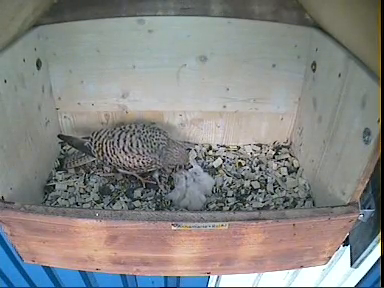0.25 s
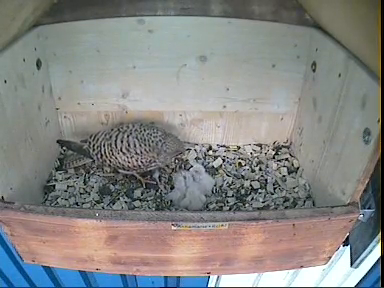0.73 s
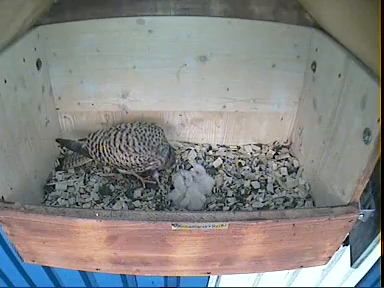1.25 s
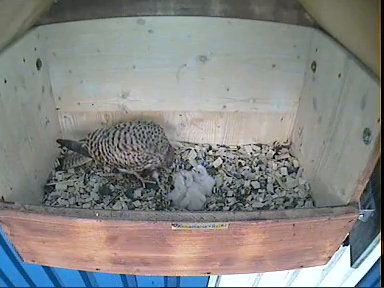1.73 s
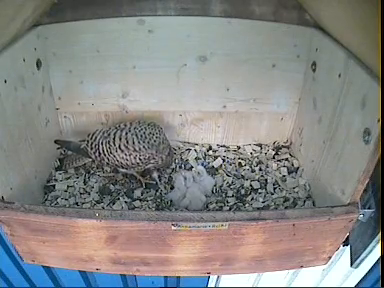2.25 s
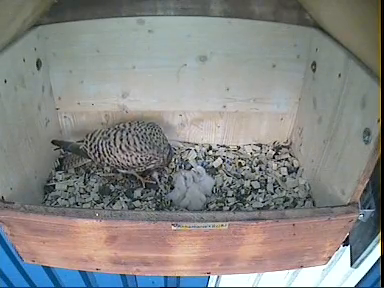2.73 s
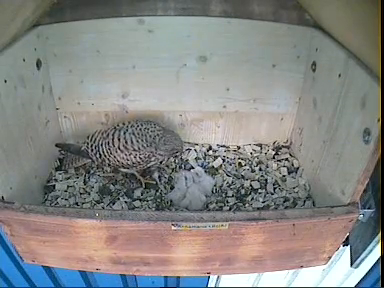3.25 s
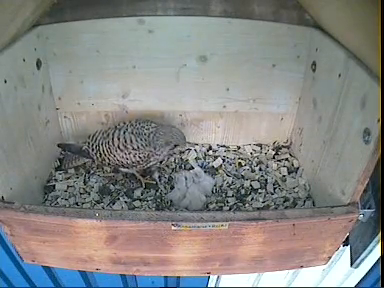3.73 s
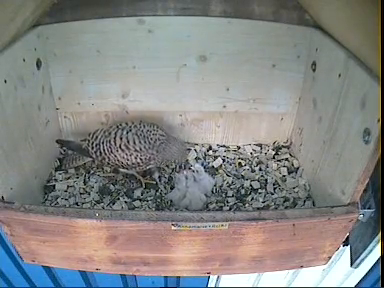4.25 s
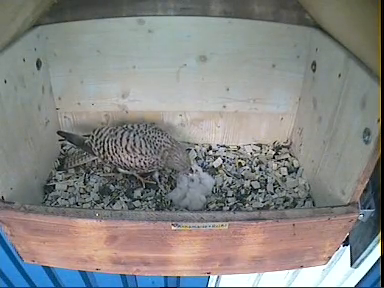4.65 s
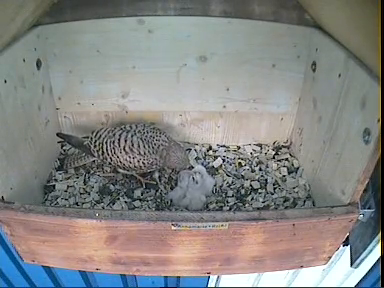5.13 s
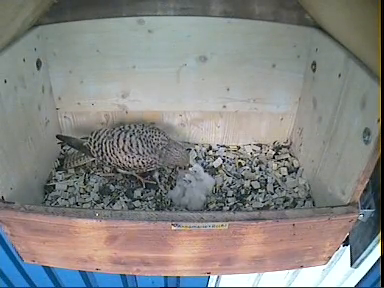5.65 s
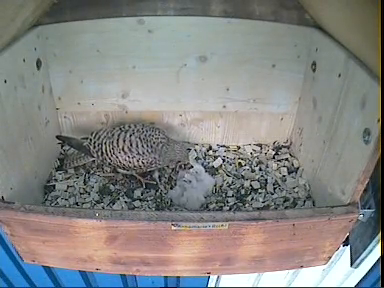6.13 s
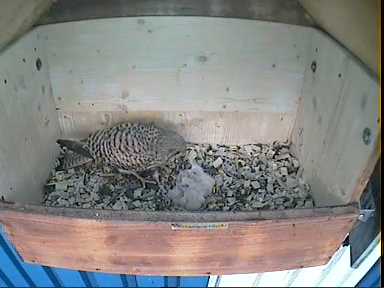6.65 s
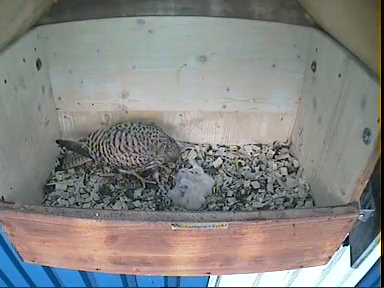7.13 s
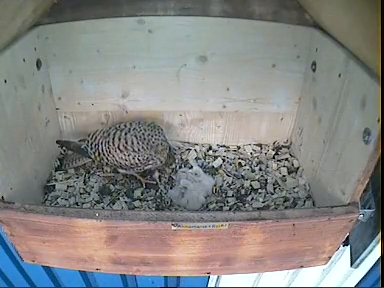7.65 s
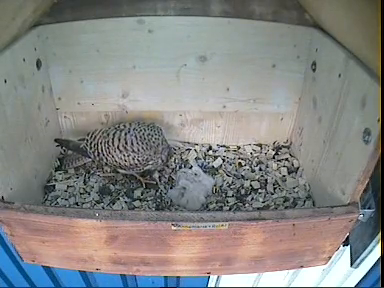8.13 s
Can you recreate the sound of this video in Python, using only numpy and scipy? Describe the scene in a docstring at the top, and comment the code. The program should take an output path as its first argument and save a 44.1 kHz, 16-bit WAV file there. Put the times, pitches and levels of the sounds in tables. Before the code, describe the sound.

Soft, evenly spaced chick peeps and three short, raspy squeaks from an adult falcon sound over a steady low rumble and hum.

```python
"""Inside a wooden nest box, a falcon chick peeps while the adult beside it gives three rough squeaks.
Each peep is a whistle that rises and falls, sometimes broken by a second, higher voice. Each squeak
follows a smack of the beak and is rough because two voices beat together while air rasps through.
Feathers and litter rustle, and the walls echo. Distant outdoor noise rings in the air of the box over
a low rumble, a hum, a thin whine and the faint buzz of the small camera whose microphone listens."""
import sys
import numpy as np
from scipy import signal
from scipy.fft import rfft, irfft
from scipy.io import wavfile
from scipy.ndimage import uniform_filter1d

SR = 44100
rng = np.random.default_rng(int(sys.argv[2]) if len(sys.argv) > 2 else 0)


def digitize_waveform(pressure):
    """Quantize a signal to 16-bit integers and store it at the path in sys.argv[1].

    Rows of a 2-D input are taken as channels; values are limited to [-1, 1].
    """
    field = np.atleast_2d(pressure).T
    bounded = np.clip(field, -1, 1)
    quanta = np.round(bounded * 32767).astype(np.int16)
    wavfile.write(sys.argv[1], SR, quanta)


N = 369558

# how well the box and microphone pass each pitch: pitch_hz, gain_db
PATH_TO_MIC = [(1900, -6), (2150, 1), (2350, 0), (2550, -6), (2850, -13), (3200, -12), (4000, -17),
               (4350, -9), (4700, -1), (5000, -5), (5300, -21), (5750, -20), (6300, -9), (7000, -18),
               (7700, -5), (8300, -20), (9000, -40)]


def chick():
    """The chick's peeps arch up and down in pitch; the low voice gives way when a high one breaks in."""
    # low voice: start_s, rise_s, fall_s, top_hz, level_db (before the path to the microphone)
    peeps = [(.629, 0.0427, 0.065, 2750, -44.5), (1.377, 0.0432, 0.044, 2780, -45),
             (2.152, 0.044, 0.044, 2807, -44), (2.837, 0.046, 0.043, 2870, -44.5),
             (3.518, 0.036, 0.054, 2894, -42.5), (4.289, 0.037, 0.0522, 2886, -43.5),
             (5.114, .042, .045, 2876, -45), (5.888, .037, .048, 2880, -42.5),
             (6.644, .064, 0.065, 3250, -56), (7.493, 0.037, .051, 2880, -43.5)]
    # high voice: start_s, length_s, pitch_hz, level_db, share_taken (from the low voice, 0 to 1)
    voice_breaks = [(3.551, 0.016, 3700, -61, 0.6), (4.322, 0.031, 3800, -57.5, 0.6),
                    (5.155, 0.025, 3670, -62, 0.4), (5.916, 0.035, 3750, -57.5, .85),
                    (6.71, 0.034, 4550, -68, 0.5), (7.528, 0.023, 3765, -57.5, 0.7)]
    # shape of the arch: top_hz, exponent (larger is flatter on top)
    flatness = [(2800, 1.45), (2890, 2.45), (3250, 2.1)]
    climb_hz_per_s, fall_hz = 15000, 905
    low, high, taken = np.zeros((3, N))
    for start, rise, fall, top_hz, db in peeps:
        flat = value_at(flatness, top_hz)
        t = np.arange(-rise, fall, 1 / SR)
        rising = climb_hz_per_s * rise * abs(t / rise) ** flat
        falling = fall_hz * abs(np.sin(np.pi / 2 * t / fall)) ** (1.8 * flat)
        hz = top_hz - np.where(t < 0, rising, falling) + 15 * wobble(len(t), 100)
        fade = np.clip(np.minimum((t + rise) / 0.0013, (fall - t) / 0.0053), 0, 1)
        level = gain_of(db + 1.2 * wobble(len(t), 70))
        add(low, start, level * fade * whistle(hz, overtone_db=-14))
    for start, length, hz, db, share in voice_breaks:
        position = np.linspace(-1, 1, round(length * SR))
        fade = signal.windows.tukey(len(position), .45)
        arch_hz = hz * (1 - 0.053 * position ** 2) + 30 * wobble(len(position), 60)
        level = gain_of(db - value_at(PATH_TO_MIC, hz))
        add(high, start, level * fade * whistle(arch_hz, overtone_db=-32))
        add(taken, start, share * fade)
    return low * (1 - taken) + high


def whistle(hz, overtone_db):
    """A tone with two flickering overtones, each shaped by the path to the microphone."""
    phase = phase_of(hz)
    strain_db = 0.044 * np.clip(hz - 2850, 0, 300)  # the voice strains at high pitch
    flicker_db = 3.6 * wobble(len(hz), 100) + strain_db
    levels_db = [0, overtone_db + flicker_db, overtone_db - 11 - flicker_db]
    return np.sqrt(2) * sum(gain_of(db + value_at(PATH_TO_MIC, k * hz)) * np.sin(k * phase)
                            for k, db in enumerate(levels_db, 1))


def adult(mix):
    """Each squeak starts thin and high, snaps down into two beating voices and leaves a rasp of air."""
    # start_s (of the full voice), hold_s, pitch_hz, level_db, mid_change_db, overtone_db, after_db,
    # air_db, tail_s, beat_hz (how far below the second voice is), second_db, half_pitch_db, thump_db
    squeaks = [(0.679, 0.015, 1926, -17.5, -8.5, -20.5, -35.5, -39.5, 0.019, 150, -8.5, -26.5, -19.5),
               (5.204, 0.016, 2325, -27, -2, 3.5, -52, -30.5, 0.051, 366.4, -1, -7.5, -11.5),
               (5.822, 0.014, 2260, -20.5, 1.5, -5.5, -53, -33.5, 0.054, 328, -18, -16, -28)]
    # tone colour of the rasping air: pitch_hz, gain_db
    rasp_colour = [(600, -13), (1500, -1), (2500, 0), (3150, -21.5), (3700, -4.5), (4200, -14),
                   (5200, -0.5), (6200, -24.5), (7500, -8.5), (9200, -15.5), (9700, -29)]
    lead_s, attack_s, release_s, fade_s = .021, 0.00483, .007, 0.013
    tail_db_per_s, thump_hz = -450, 382.7
    for (start, hold, held_hz, held_db, mid_db, top_db, after_db, air_db, tail,
         beat_hz, second_db, half_db, thump_db) in squeaks:
        t = np.arange(start - lead_s, start + hold + tail + fade_s, 1 / SR)
        # pitch and levels slide from one of these moments to the next
        moments = start + np.array([-lead_s, -attack_s, 0, hold / 2, hold,
                                    hold + release_s, hold + tail, hold + tail + fade_s])
        hz = np.interp(t, moments[:6], [2801, 2655, held_hz, held_hz, held_hz - 20, 2310])
        voice_db = np.interp(t, moments, [-64, -44.5, held_db, held_db + mid_db, held_db,
                                          after_db, after_db + tail_db_per_s * tail, -86.5])
        overtone_db = np.interp(t, moments[1:6], [0.5, top_db - 5, top_db, top_db - 7, -16])
        rasp_db = np.interp(t, np.delete(moments, 3), [-46, -39.5, air_db, air_db - 3.5, -40, -56, -86.5])
        phase = phase_of(hz + 25 * wobble(len(t), 40))
        beat = 2 * np.pi * beat_hz * (t - start - .0025)
        voice = np.sin(phase) + gain_of(second_db) * np.sin(phase - beat)
        octave = np.cos(2 * phase) * (1 + 0.21 * np.cos(beat))  # cosine makes downward swings larger
        upper = gain_of(-22) * (np.sin(3 * phase) + 0.32 * np.sin(4 * phase))
        voice += gain_of(overtone_db) * (octave + upper)
        # every other cycle differs, which adds a tone at half the pitch
        voice += gain_of(half_db) * (np.sin(phase / 2) + 0.23 * np.sin(3 * phase / 2))
        voice += gain_of(thump_db) * np.sin(2 * np.pi * thump_hz * t)  # the air in the box thumps
        rasp = gain_of(rasp_db) * shaped_noise(value_at(rasp_colour, np.fft.rfftfreq(8192, 1 / SR)), len(t))
        voice *= np.sqrt(2) * gain_of(voice_db + 1.05 * wobble(len(t), 40))
        add(mix, t[0], (voice + rasp) * signal.windows.tukey(len(t), .08))


def beak_smacks(mix):
    """The beak opens with a smack before each squeak."""
    # start_s, peak_db, pitch_hz, rise_s, ring_s
    smacks = [(0.6598, -27.5, 2060, 0.0044, 0.015), (5.1821, -25, 1970, 0.00176, 0.026),
              (5.8, -25.5, 1860, 0.0015, 0.025)]
    for start, *shape in smacks:
        add(mix, start, click(*shape, grit=0.52, grain_samples=20))


def litter_ticks(mix):
    """Faint dry ticks in the litter on the floor."""
    # start_s, peak_db
    ticks = [(2.281, -62), (7.878, -54)]
    for start, db in ticks:
        add(mix, start, click(db, hz=7700, rise_s=.001, ring_s=.02, grit=0.45, grain_samples=6))


def rustles(mix):
    """Feathers and litter rustle and wheeze: grainy puffs of noise, each around one pitch."""
    # start_s, length_s, pitch_hz, width_hz, level_db
    puffs = [(.97, 0.078, 4700, 1210, -68), (1.032, .08, 4120, 900, -68), (4.417, 0.12, 4630, 900, -70.5),
             (6.066, 0.098, 7500, 3010, -76.5), (7.23, .05, 4600, 150, -71),
             (7.682, 0.15, 4570, 150, -71.5), (7.89, 0.035, 4460, 150, -69), (7.963, 0.11, 3600, 120, -75)]
    hz = np.fft.rfftfreq(8192, 1 / SR)
    for start, length, pitch, width, db in puffs:
        count = round(length * SR)
        puff = shaped_noise(-12 * np.log10(1 + (2 * (hz - pitch) / width) ** 4), count)
        level = gain_of(db + 2.3 * wobble(count, 150))
        add(mix, start, level * np.hanning(count) * puff)


def wall_echoes(sound, ring_s=0.098):
    """The wooden walls throw back many quick echoes."""
    t = np.arange(8000) / SR
    echoes = rng.standard_normal(len(t)) * gain_of(-60 * t / ring_s) * (t > .0015)
    return signal.oaconvolve(sound, echoes / np.linalg.norm(echoes))[:N]


def outdoor_wash(level_db=-42.5):
    """Outdoor noise and rumble swell gently, and the air in the box rings at its own pitches."""
    # tone colour of the noise: pitch_hz, gain_db
    colour = [(12, -32.5), (20, -8.5), (36, -13.5), (48, 0), (64, 0), (85, -10), (130, -7.5), (165, -19),
              (215, -37.5), (300, -21), (770, -22.5), (1000, -23), (2000, -26), (2450, -40), (3300, -47),
              (5000, -55), (6200, -59.5), (7600, -65.5), (8200, -72), (8700, -87)]
    # where the air in the box rings: pitch_hz, width_hz, boost_db
    box_rings = [(359.8, 17, 7), (838, 21, 10), (936, 76, 10.5), (1076.3, 120, 6.5), (1317.9, 74, 7),
                 (1585, 70, 7.5), (1806.2, 145, 10), (4360, 547, 12)]
    # swell near 900 Hz: time_s, gain_db
    middle_swell = [(0, -0.5), (2.4, -1.8), (5.5, 0.5), (6.3, 1.5), (7.35, 3.5), (8.38, -0.5)]
    # swell of the rumble: time_s, gain_db
    rumble_swell = [(0, -1), (1.3, -1.5), (3.5, 2.55), (4.2, -0.5), (6.0, -1.66), (8.38, -0.5)]
    frames, hz = N // 512 + 4, np.fft.rfftfreq(2048, 1 / SR)
    real, imaginary, patches = rng.standard_normal((frames, 1025, 3)).T
    # audio compression makes the faint high hiss flicker in patches
    patches = unit_level(uniform_filter1d(uniform_filter1d(patches, 14, axis=0), 8, axis=1))
    compression_db = value_at([(3000, 0.69), (5000, 1.3), (7000, 7.91)], hz)[:, None] * patches
    swell_db = np.outer(np.exp(-np.log((hz + 1) / 900) ** 2 / 0.65), over_time(middle_swell, frames))
    swell_db += np.outer(np.exp(-(hz / 110) ** 4), over_time(rumble_swell, frames))
    ring_db = sum(db / (1 + (2 * (hz - pitch) / width) ** 2) for pitch, width, db in box_rings)
    steady_db = (value_at(colour, hz) + ring_db)[:, None]
    spectrum = (real + 1j * imaginary) * gain_of(steady_db + swell_db + compression_db)
    noise = signal.istft(spectrum, nperseg=2048, noverlap=1536)[1][:N]
    return gain_of(level_db) * unit_level(noise)


def whine():
    """A thin tone that wanders in pitch as it comes and goes."""
    # time_s, pitch_hz, level_db
    course = [(0, 814, -51.5), (.42, 805, -63.5), (.6, 820, -54.5), (1.0, 814, -62), (2.4, 814.9, -59.5),
              (3.08, 816, -52.5), (3.4, 802, -58.5), (4.04, 810, -56), (4.62, 807, -73), (4.95, 803, -54.5),
              (5.5, 810, -65), (5.95, 811, -49.5), (6.3, 803, -66), (8.38, 814, -59)]
    times, pitches, _ = np.transpose(course)
    hz = np.interp(np.arange(N) / SR, times, pitches)
    return wavering_tone(hz, over_time(course, N), waver_hz=4.81, smooth_samples=1500)


def hum(hz=118.77):
    """A low hum that comes and goes."""
    # time_s, level_db
    levels = [(0, -48), (.25, -44.5), (.58, -71), (1.45, -66), (1.75, -49), (2.4, -47.5), (3.4, -50.5),
              (3.7, -53.5), (4.6, -55), (5.0, -56), (5.95, -52.5), (6.3, -62), (7.35, -52.5), (8.38, -54.5)]
    return wavering_tone(hz, over_time(levels, N), waver_hz=1.5, smooth_samples=4000)


def camera_buzz(centre_hz=8000, step_hz=100 / 3, each_db=-88.5):
    """The electronics buzz: six close tones add up to one tone swept again and again."""
    t = np.arange(N) / SR
    tones = sum(np.sin(2 * np.pi * ((centre_hz + (k - 2.5) * step_hz) * t + k * k / 12))
                for k in range(6))
    return gain_of(each_db) * np.sqrt(2) * tones


def click(db, hz, rise_s, ring_s, grit, grain_samples):
    """An unsteady ring that starts softly, then dies away by 60 dB in ring_s."""
    t = np.arange(2000) / SR
    ring = np.sin(2 * np.pi * hz * t) * (1 + grit * wobble(len(t), grain_samples))
    onset = np.minimum(t / rise_s, 1) ** 2
    return gain_of(db - 60 * np.maximum(t - rise_s, 0) / ring_s) * onset * ring


def wavering_tone(hz, db, waver_hz, smooth_samples):
    """A tone whose pitch wanders a little."""
    return gain_of(db) * np.sqrt(2) * np.sin(phase_of(hz + waver_hz * wobble(N, smooth_samples)))


def shaped_noise(gains_db, count):
    """Noise coloured by gains at evenly spaced pitches."""
    white = rng.standard_normal(2 * len(gains_db) - 2)
    return unit_level(irfft(rfft(white) * gain_of(gains_db)))[:count]


def wobble(count, smooth_samples):
    """A smooth random wiggle of typical size 1."""
    rough = uniform_filter1d(rng.standard_normal(count), smooth_samples)
    return unit_level(uniform_filter1d(rough, smooth_samples))


def over_time(table, count):
    """A table's last column at evenly spaced moments."""
    columns = np.transpose(table)
    return np.interp(np.linspace(0, N / SR, count), columns[0], columns[-1])


def value_at(table, hz):
    """A table's value at any pitch."""
    pitches, values = np.transpose(table)
    return np.interp(np.log(hz + 1), np.log(pitches + 1), values)


def phase_of(hz):
    return 2 * np.pi * np.cumsum(hz) / SR


def gain_of(db):
    return 10 ** (np.asarray(db) / 20)


def unit_level(sound):
    return sound / np.sqrt(np.mean(sound ** 2) + 1e-20)


def add(mix, start_s, sound):
    part = mix[round(start_s * SR):][:len(sound)]
    part += sound[:len(part)]


def scene():
    """The birds and their echoes over the background, in one channel."""
    birds = chick()
    adult(birds)
    beak_smacks(birds)
    litter_ticks(birds)
    rustles(birds)
    echoes = gain_of(-17) * wall_echoes(birds)
    return (birds + echoes + outdoor_wash() + whine() + hum() + camera_buzz())[None]


def record(dry):
    """The camera cuts the highest treble, and its converter adds a small steady offset."""
    cutoff_hz, offset = 10350, -.0116
    treble_cut = signal.firwin(511, cutoff_hz, window=("kaiser", 9), fs=SR)
    return signal.oaconvolve(dry, treble_cut[None], "same") + offset


dry = scene()
out = record(dry)
digitize_waveform(out)
```